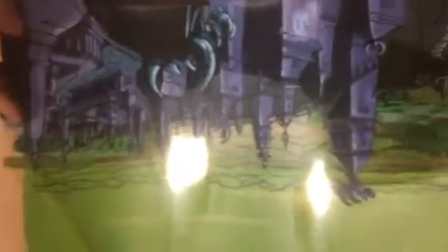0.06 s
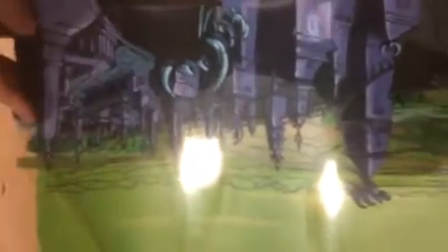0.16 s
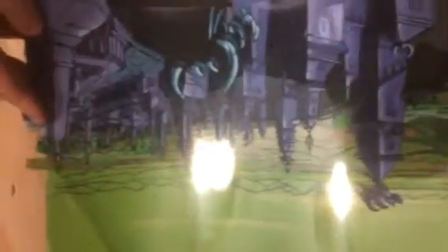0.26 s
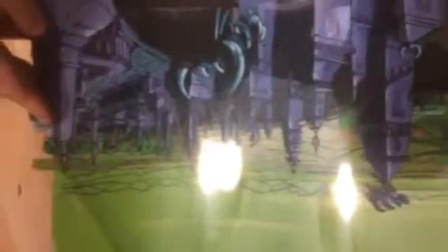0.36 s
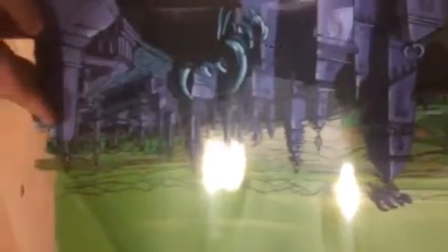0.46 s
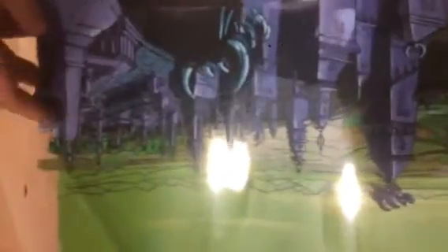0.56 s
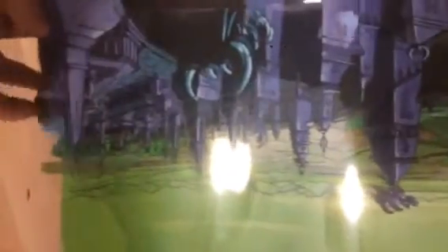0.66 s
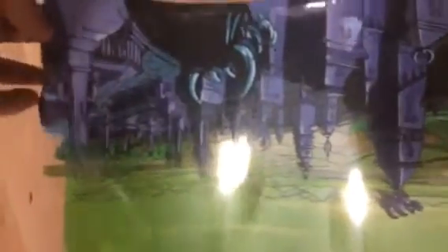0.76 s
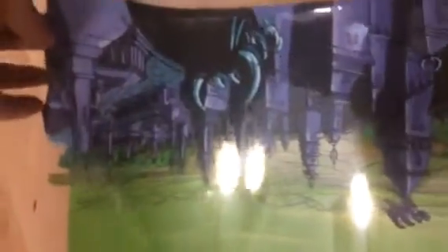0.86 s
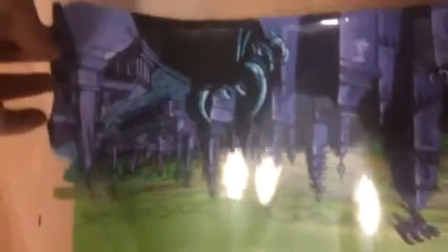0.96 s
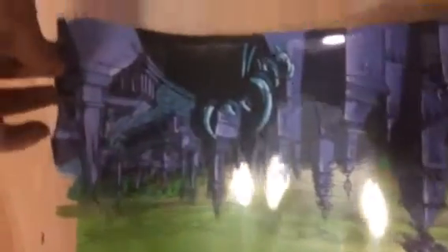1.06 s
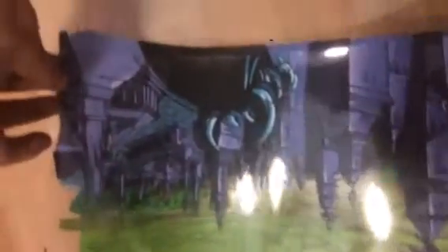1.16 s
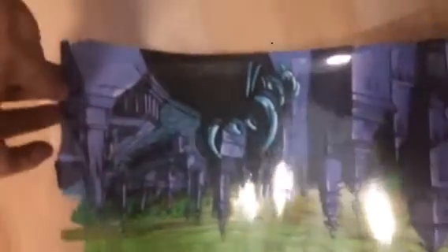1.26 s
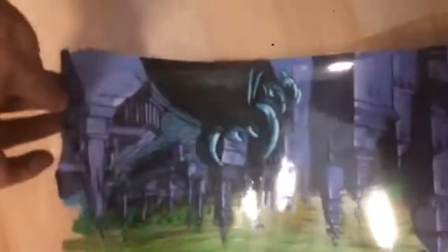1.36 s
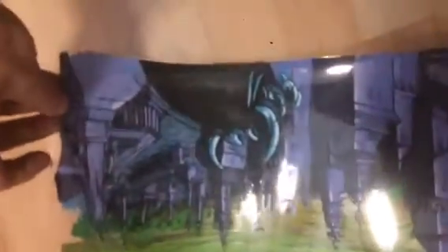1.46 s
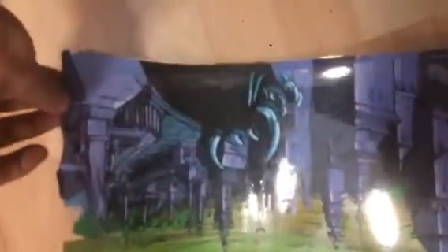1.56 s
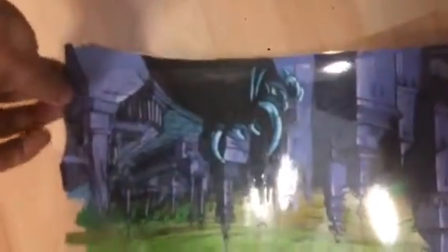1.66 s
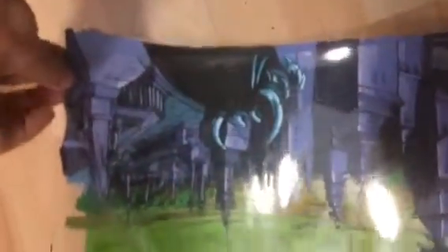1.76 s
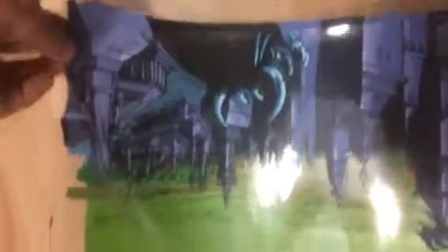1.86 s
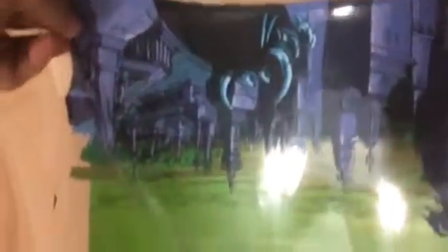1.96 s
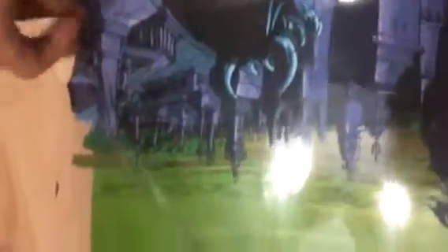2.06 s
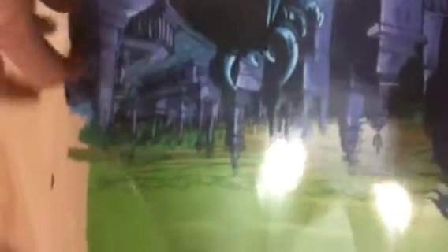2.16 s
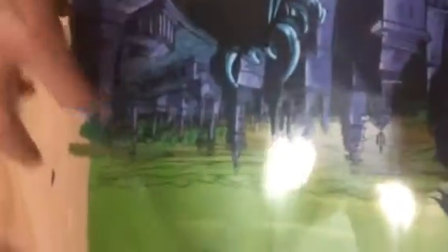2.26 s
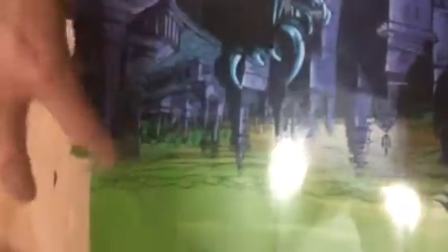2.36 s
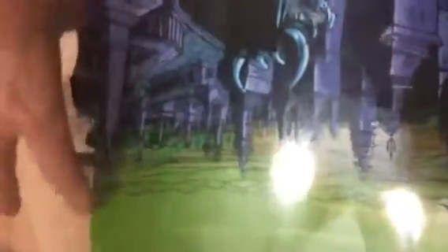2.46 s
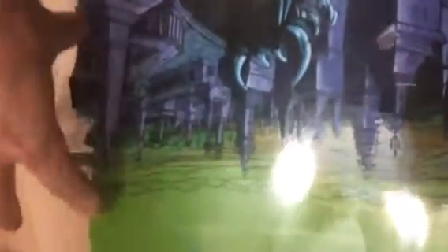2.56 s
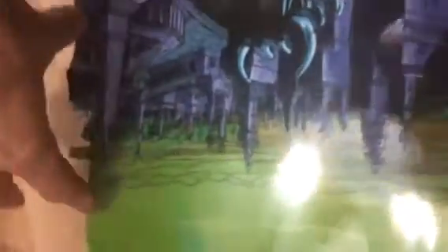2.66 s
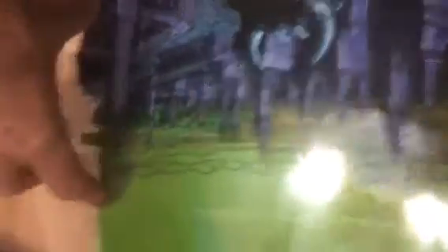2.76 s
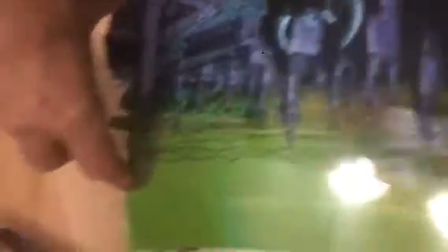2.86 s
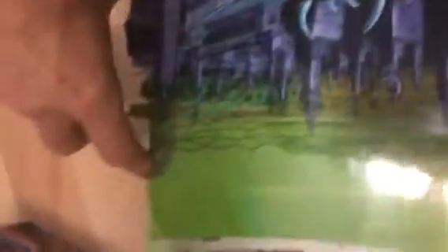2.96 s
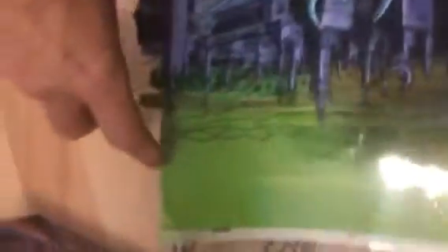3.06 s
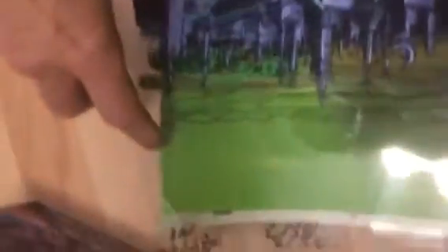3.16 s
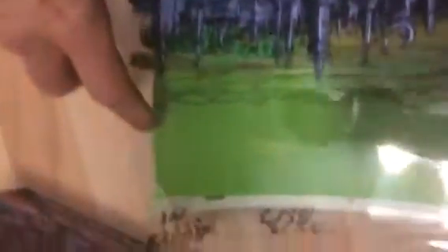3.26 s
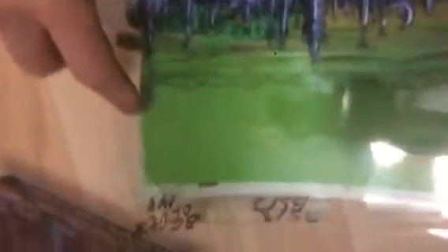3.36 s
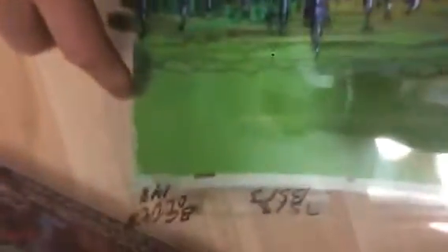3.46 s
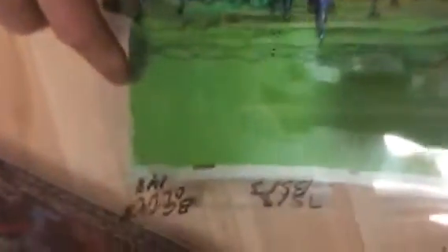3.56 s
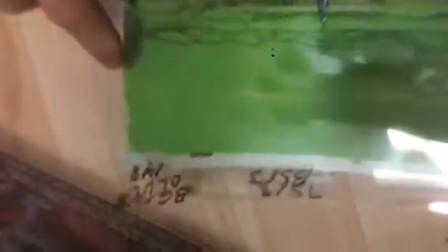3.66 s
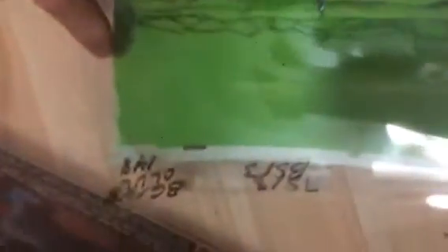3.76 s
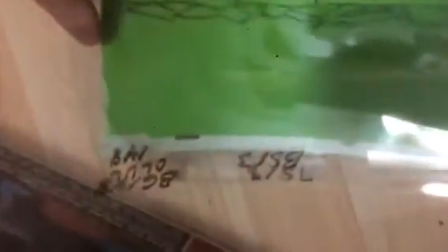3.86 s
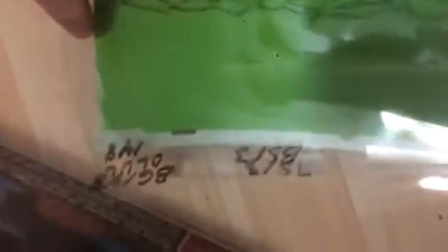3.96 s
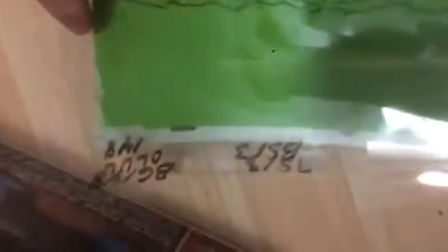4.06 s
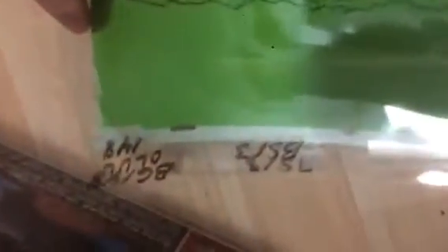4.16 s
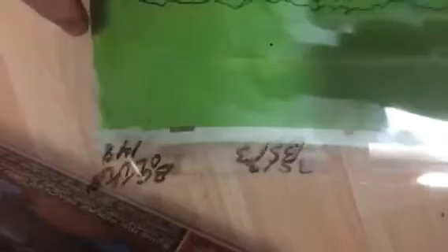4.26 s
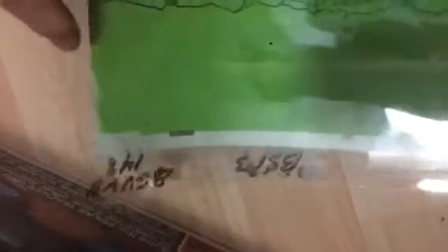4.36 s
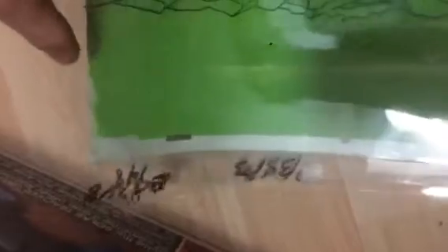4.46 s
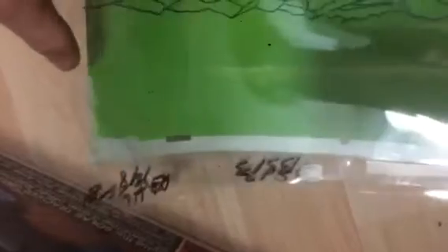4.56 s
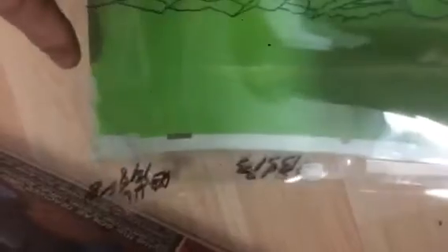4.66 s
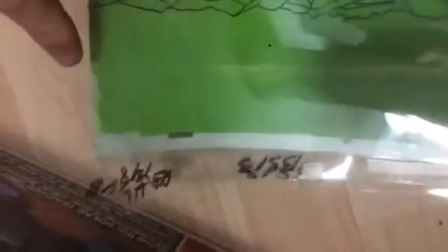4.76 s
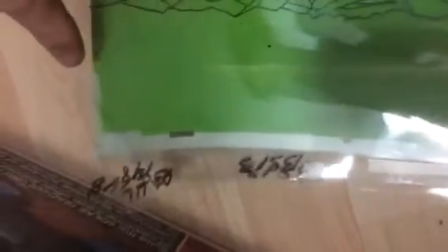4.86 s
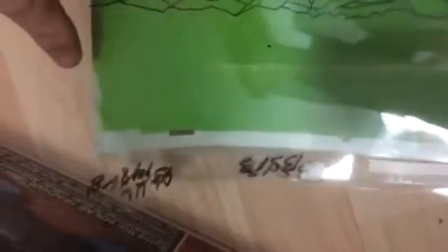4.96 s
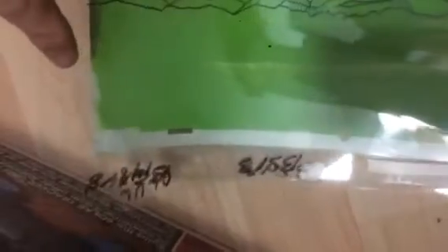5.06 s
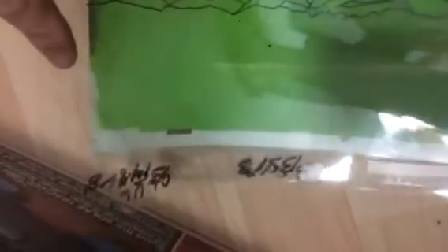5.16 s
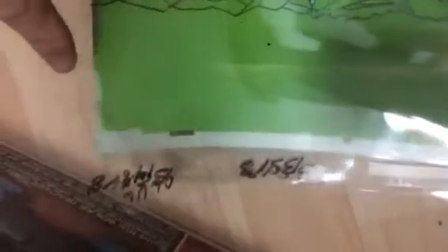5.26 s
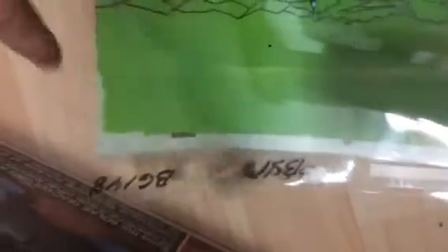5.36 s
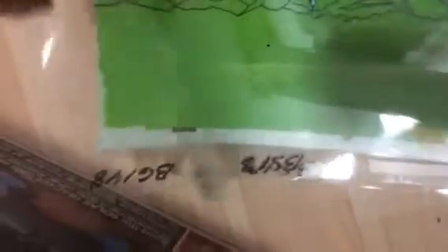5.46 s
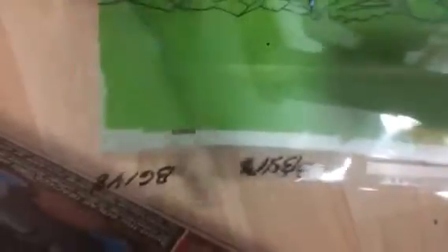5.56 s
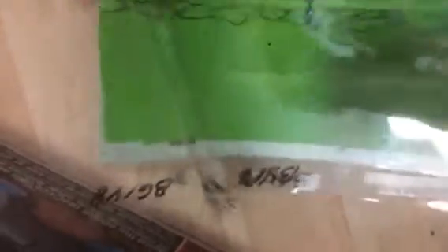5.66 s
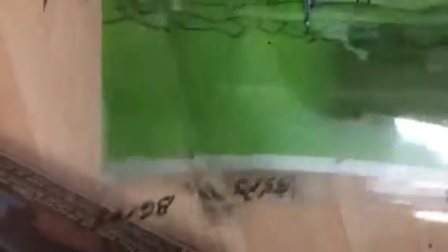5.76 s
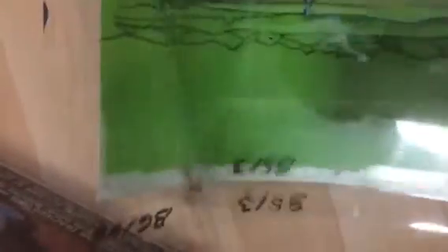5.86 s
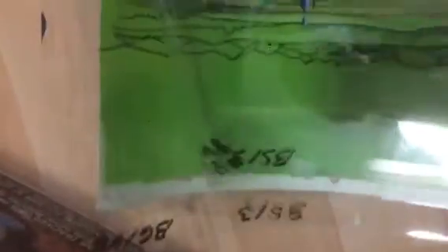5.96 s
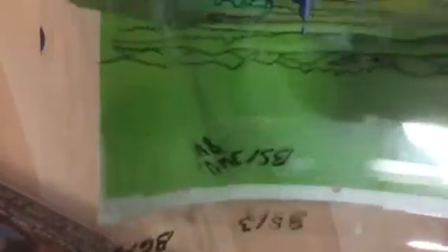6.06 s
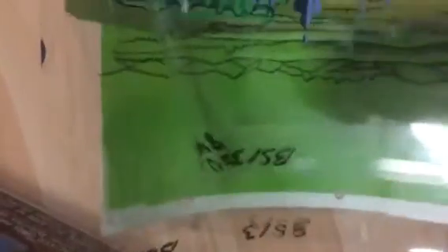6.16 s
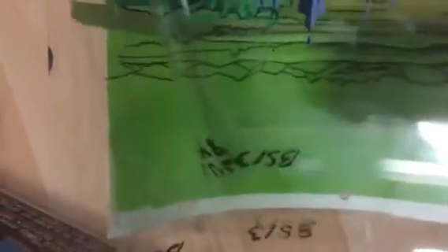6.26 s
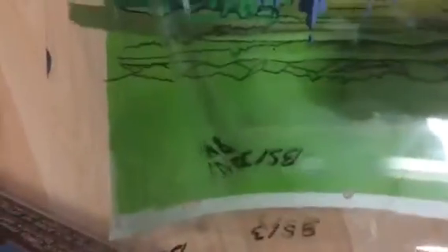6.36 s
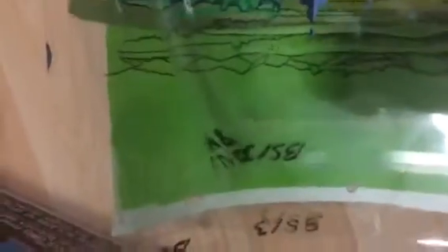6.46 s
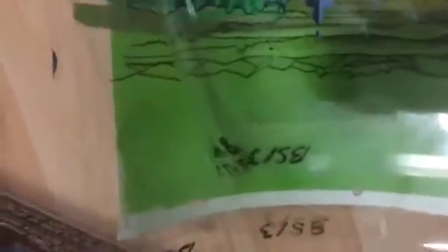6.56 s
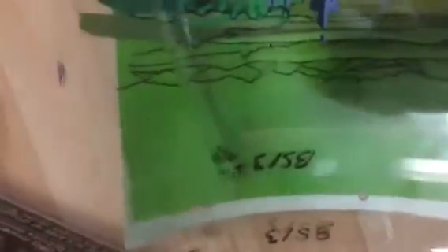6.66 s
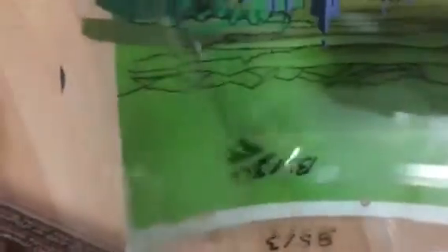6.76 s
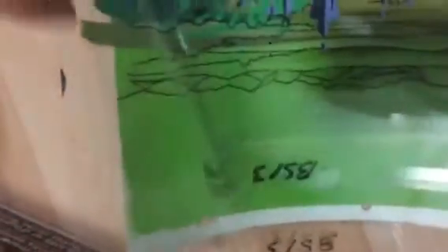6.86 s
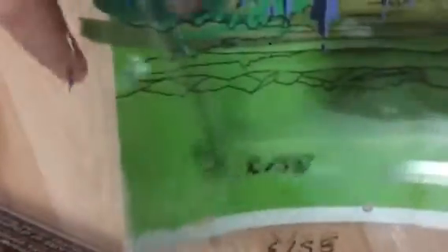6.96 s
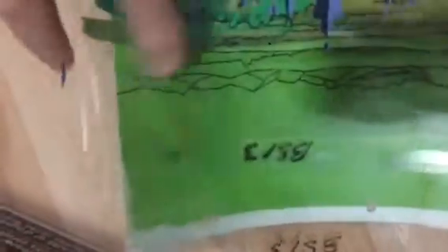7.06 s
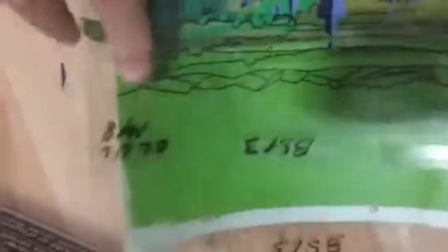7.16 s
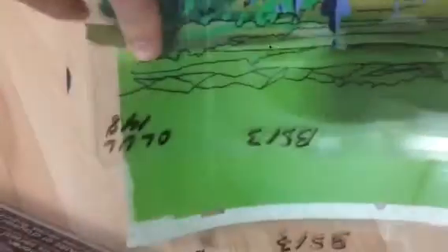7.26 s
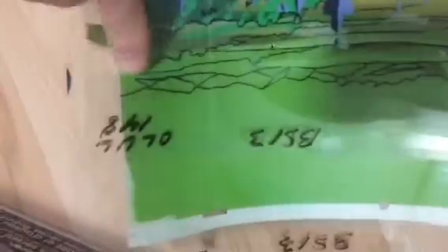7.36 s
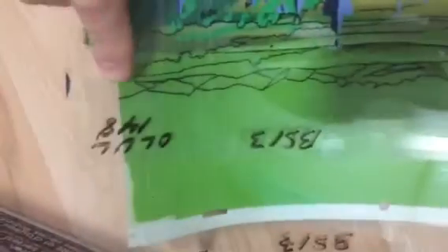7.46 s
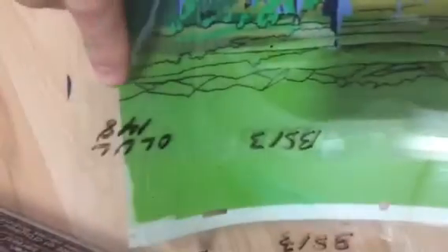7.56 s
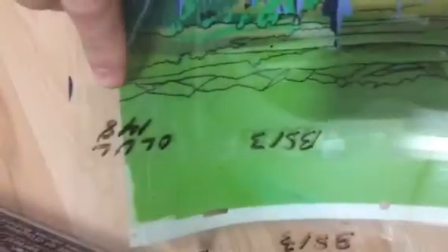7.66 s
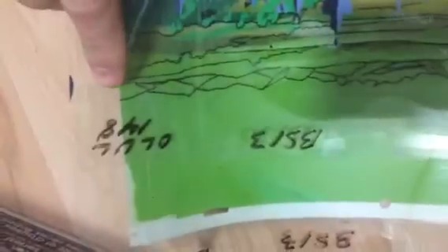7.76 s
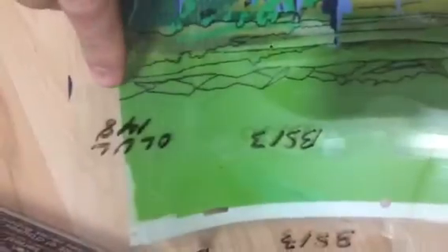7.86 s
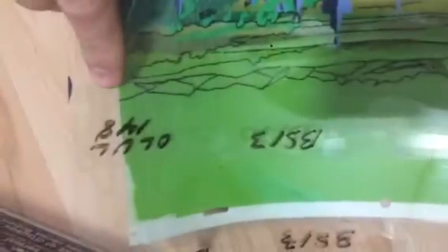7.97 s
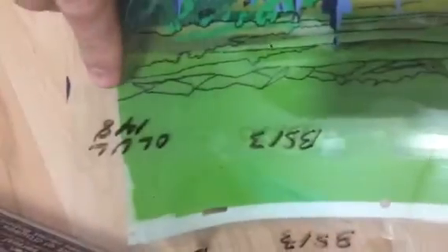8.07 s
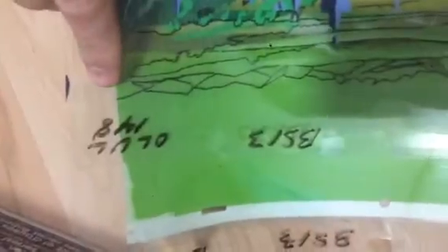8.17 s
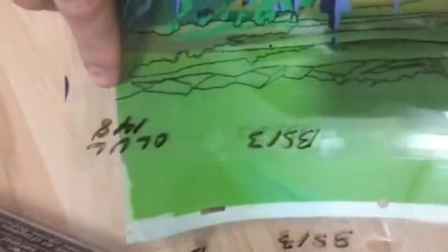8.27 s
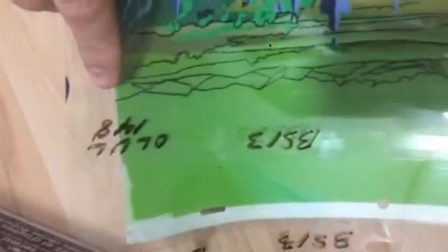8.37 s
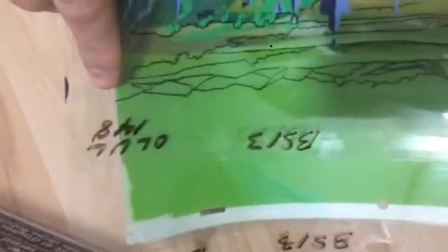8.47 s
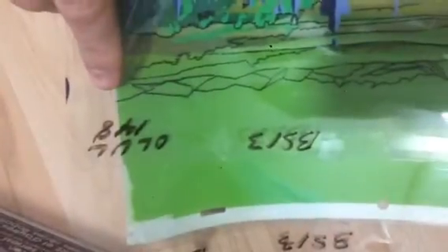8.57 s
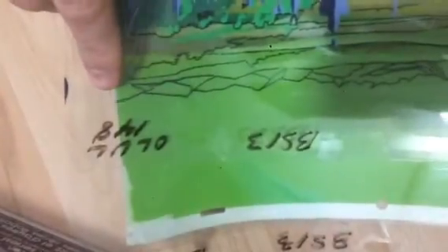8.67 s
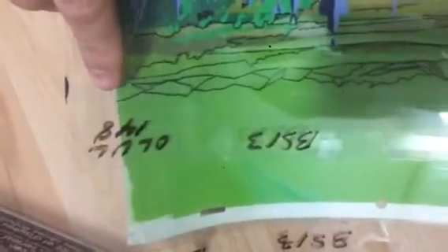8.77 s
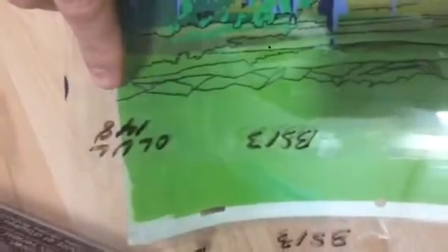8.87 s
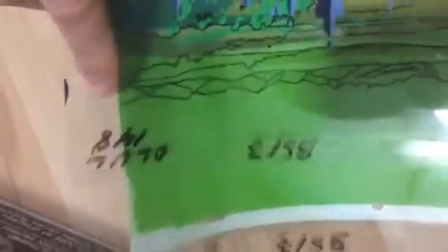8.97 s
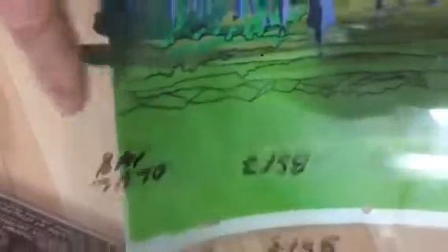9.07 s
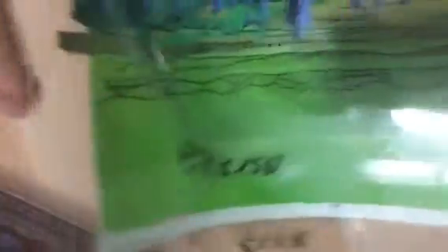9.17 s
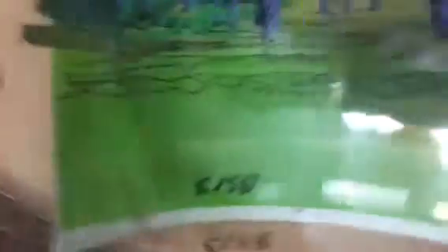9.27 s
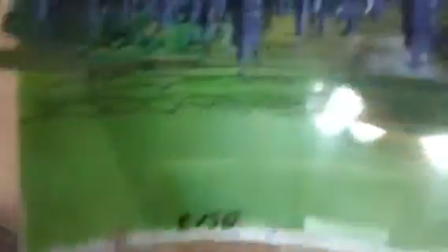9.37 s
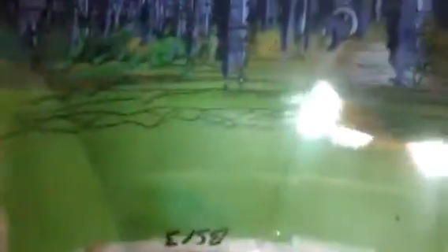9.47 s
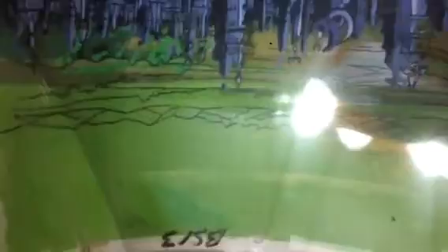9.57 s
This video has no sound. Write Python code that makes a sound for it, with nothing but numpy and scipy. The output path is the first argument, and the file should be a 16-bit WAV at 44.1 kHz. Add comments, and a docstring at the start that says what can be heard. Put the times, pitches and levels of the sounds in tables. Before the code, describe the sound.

Hands shift and lift slick film sheets over a tabletop. Papery hissing strokes come in uneven clusters, with bright clicks, brief gliding edge tones, light low thumps and faint low flutter. The strongest rustles arrive after the middle, then almost nothing, then a rapid crackle and slide at the end. Close microphone, little echo, faint air noise and hum.

```python
"""Clear plastic sheets and paper slide over a wooden table close by: tiny friction slips ring the sheets' modes.
Dragged edges sing in gliding resonances or squeak on one bending note; flicks and buckles are filtered
noise bursts with a crack. Fingers and falling sheets thump softly as damped low swings with a puff of air.
Bending sheets flutter at a low pitch. Behind lie the sparse echoes, air noise and faint hum of a small room."""
import sys
import numpy as np
from scipy import signal
from scipy.fft import rfft, irfft
from scipy.io import wavfile
from scipy.ndimage import uniform_filter1d

SR = 44100
rng = np.random.default_rng(int(sys.argv[2]) if len(sys.argv) > 2 else 0)


def store_wav(level_fs):
    """Save 16-bit WAV to argv[1]."""
    pcm = np.round(np.clip(np.atleast_2d(level_fs), -1, 1) * 32767)
    wavfile.write(sys.argv[1], SR, pcm.T.astype(np.int16))


N = 423360


def gain_of(db):
    """Logarithmic level: converts decibels to an amplitude ratio."""
    return 10 ** (np.asarray(db) / 20)


def evened(x):
    """Normalization: scales a signal to rms 1."""
    return x / np.sqrt(np.mean(x ** 2) + 1e-20)


def read(points, hz):
    """Spectral interpolation: reads a table along a logarithmic frequency axis."""
    f, value = np.transpose(points)
    return np.interp(np.log(hz + 1), np.log(f + 1), value)


def add(mix, s, sound):
    """Superposition: adds a sound to the mix from time s [s]."""
    part = mix[max(round(s * SR), 0):][:len(sound)]
    part += sound[:len(part)]


def band(hz, low_hz, high_hz):
    """Band-pass response: gain with skirts of 12 dB per octave."""
    low_skirt = 1 + (low_hz / (hz + 1)) ** 4
    high_skirt = 1 + (hz / high_hz) ** 4
    return 1 / np.sqrt(low_skirt * high_skirt)


def causal(gain):
    """Minimum phase: the quickest-starting impulse response that has this gain curve."""
    log_gain = np.log(np.maximum(gain, 1e-5))
    circle = np.r_[log_gain, log_gain[-2:0:-1]]
    return np.fft.ifft(np.exp(np.conj(signal.hilbert(circle)))).real


def noise(colour):
    """Spectral shaping: steady noise of rms 1 with the gain curve colour(hz)."""
    spectrum = rfft(rng.standard_normal(N))
    return evened(irfft(spectrum * colour(np.fft.rfftfreq(N, 1 / SR)), N))


def drift(shape, size):
    """Smoothed randomness: a twice-averaged random field of rms 1."""
    field = rng.standard_normal(shape)
    for axis, span in enumerate(size):
        field = uniform_filter1d(uniform_filter1d(field, span, axis), span, axis)
    return evened(field)


def background(air_db=-68, hum_hz=120, hum_db=-75.5):
    """Stationary room noise: coloured air noise and a sinusoidal mains hum, at rms levels."""
    # spectrum of the air: (frequency [Hz], relative level [dB])
    air_colour = [(24, -39.5), (40, -2), (121, -8), (147, -12), (243, -17), (491, -22), (542, -21),
                  (600, -26), (1040, -24.5), (1150, -27), (5310, -36.5), (14100, -36), (16000, -43)]
    air = noise(lambda hz: gain_of(read(air_colour, hz)))
    hum = np.sqrt(2) * np.sin(2 * np.pi * hum_hz * np.arange(N) / SR)
    return gain_of(air_db) * air + gain_of(hum_db) * hum


def wobbling(low_hz=62, high_hz=90, lumpy_db=2):
    """Low-frequency radiation: bending sheets fan the air, as narrow-band noise in uneven lumps."""
    # flutter of the sheets: (time [s], level before the lumps [dB])
    wobble = [(0, -88), (.5, -67), (1.2, -76.5), (1.8, -69.5), (3.2, -79), (4.8, -69), (6.8, -65), (8, -65),
              (8.4, -74.5), (9.6, -67.5)]
    level_db = np.interp(np.arange(N) / SR, *np.transpose(wobble))
    level_db = level_db + lumpy_db * drift(N, size=[4000])
    return noise(lambda hz: band(hz, low_hz, high_hz) ** 2) * gain_of(level_db)


def room(x, first_s=0.002):
    """Reverberation: sparse reflections whose frequency bands decay at different rates."""
    # decay of the room: (frequency [Hz], time to fall 60 dB [s])
    reverberation = [(200, 0.11), (1500, 0.34), (5000, 0.1), (14000, 0.32)]
    count = SR // 2
    present = rng.random(count) < 3000 / SR  # 3000 reflections per second
    taps = rng.choice([-1., 1.], count) * present * (np.arange(count) > first_s * SR)
    hz, t, z = signal.stft(taps, SR, nperseg=256)
    decay_db = -60 * t / read(reverberation, hz)[:, None]
    tail = signal.istft(z * gain_of(decay_db), SR, nperseg=256)[1]
    return signal.fftconvolve(x, tail / np.linalg.norm(tail))[:N]


def thumping(puff_db=-9, puff_reach=2.8):
    """Damped oscillation: each soft blow is a few low swings and a noisy puff of squeezed-out air."""
    # blows of fingers and sheets on the table:
    # (time [s], swing level before its envelope [dB], pitch [Hz], decay [s])
    thumps = [(0.082, -50, 203, 0.0071), (0.108, -43.5, 200, 0.0051), (0.782, -39, 150, 0.0055),
              (1.609, -47.5, 232, 0.0063), (2.203, -33, 241, 0.005), (2.206, -29, 623, 0.0036),
              (2.251, -43.5, 196, 0.0053), (3.576, -31.5, 1190, 0.003), (3.872, -43.5, 183, 0.0034),
              (5.452, -35.5, 126, 0.0063), (5.512, -44, 149, 0.0073), (5.548, -46, 150, 0.01),
              (5.9675, -25.5, 725, 0.0045), (6.788, -42, 72.5, 0.024), (6.995, -28, 136, 0.0025),
              (7.068, -44, 252, 0.0034), (7.184, -32, 86, 0.0089), (7.19, -39, 476, 0.0038),
              (9.237, -49, 322, 0.013), (9.373, -46, 115, 0.0099)]
    out, t = np.zeros(N), np.arange(SR // 5) / SR
    for s, db, hz, decay in thumps:
        puff_band = signal.butter(2, [hz / 2, hz * puff_reach], "band", fs=SR, output="sos")
        puff = evened(signal.sosfilt(puff_band, rng.standard_normal(len(t))))
        swing = np.sin(2 * np.pi * hz * t) + gain_of(puff_db) * puff
        envelope = np.exp(-t / decay) * (1 - np.exp(-t / 0.0015))  # onset softened over 1.5 ms
        add(out, s, gain_of(db) * swing * envelope)
    return out


def snapping(level_db=-3.0, sudden_s=0.00023, ring_db=-25, ring_s=0.026, crack=1.0,
             focus_db=7, focus_octaves=0.52):
    """Sudden release: an edge scrapes harder, lets go with a crack, and the sheet rings briefly."""
    # flicks, buckles and taps of a sheet:
    # (time [s], relative level [dB], centre [Hz], breadth [octaves], build-up [s], decay [s])
    snaps = [(0.084, -14, 490, 1.1, 0.003, 0.0018), (0.112, -14, 900, 0.9, 0.00022, 0.0018),
             (0.208, -14, 1440, 1.7, 0.0015, 0.004), (0.721, -5, 2450, 0.96, 0.001, 0.0049),
             (0.77, 13.5, 3420, 1.16, 0.0069, 0.0024), (0.773, 18.5, 2180, 0.2, 0.0015, 0.0014),
             (0.7804, 19.5, 2000, 0.1, 0.00072, 0.00083), (1.608, -10, 1400, 6.6, 0.0019, 0.0042),
             (2.2038, 8, 2210, 4.1, 0.00023, 0.0021), (2.2067, 21.5, 2840, 0.48, 0.00071, 0.0012),
             (2.253, 11, 3300, 2.7, 0.0038, 0.0015), (2.258, 3, 2660, 4, 0.002, 0.0068),
             (2.398, -1.5, 3080, 2.2, 0.0022, 0.048), (2.495, 5.5, 3300, 0.71, 0.0019, 0.017),
             (2.801, -19, 2020, 4.4, 0.00018, .0036), (3.5652, -11, 3200, 4, 0.00018, 0.0018),
             (3.575, 1, 2470, 1.94, 0.00038, 0.00078), (5.133, -8.5, 2380, 1.4, 0.0003, 0.0011),
             (5.426, 21.5, 3660, 0.067, 0.002, 0.0037), (5.4295, 20.5, 3900, 0.08, 0.00032, 0.0013),
             (5.431, 8.5, 1505, 0.4, 0.0014, 0.0015), (5.448, 4, 1034, 1.6, 0.0033, 0.003),
             (5.818, -0.5, 3070, 1.8, 0.00068, 0.0031), (5.9668, 6.5, 3840, 4.2, 0.000028, .0004),
             (5.969, 3, 2280, 3.8, 0.00031, 0.008), (6.7809, 4.5, 3000, 0.64, 0.0013, 0.00068),
             (6.791, -8, 2810, 3.9, 0.0059, .0013), (6.998, 8.5, 2000, 2.16, 0.0023, 0.0026),
             (7.041, 5, 2680, .1, 0.00098, .0018), (7.07, 1.5, 1410, 0.91, 0.00036, 0.0023),
             (7.173, -5.5, 3650, 2.3, 0.00018, 0.00066), (7.1865, 3, 3200, 5.2, 0.00067, 0.00057),
             (7.1871, 12.5, 11200, 0.32, 0.001, 0.0007), (7.202, -8, 9100, 1.4, 0.0002, 0.0008),
             (7.192, -0.5, 1430, 2.6, 0.00051, 0.0048), (7.979, -23.5, 2580, 3.9, 0.000089, 0.0027),
             (8.681, -6.5, 845, .1, 0.00013, 0.00089), (8.697, -6.5, 1165, .1, .0003, 0.0036),
             (8.992, -9, 2850, 2.6, 0.00054, 0.00031), (9.081, 0, 1820, 3.8, 0.0014, 0.00098),
             (9.105, -1, 2480, 4.4, 0.0044, 0.0039), (9.118, 16, 4470, 0.75, 0.00016, 0.00038),
             (9.132, 2, 3430, 3.2, .0023, 0.0064), (9.14, 15, 4400, 0.55, 0.00031, 0.00037),
             (9.143, 11, 4400, 0.3, 0.00074, 0.0015), (9.1468, 15.5, 2930, 2, 0.0004, 0.0014),
             (9.1514, 8.5, 3300, 2.9, 0.0004, 0.0017), (9.1565, 8, 4300, 1.4, 0.00042, 0.0013),
             (9.163, 15, 4200, 0.6, 0.00047, 0.00038), (9.1644, 8, 2840, 3.9, 0.0005, 0.0039),
             (9.2095, 18, 2400, 2, 0.00051, 0.00092), (9.2336, 26, 1630, 0.66, 0.00066, 0.00097)]
    # spectrum of a snap: (frequency [Hz], relative level [dB])
    snap_colour = [(300, -1), (600, 0.5), (1000, -6.5), (1500, -5.5), (2000, -5.5), (2700, -9), (4500, -6),
                   (6500, -5.5), (8500, -12), (12000, -12.5), (15500, -20)]
    taps = 2048
    out, hz = np.zeros(N), np.fft.rfftfreq(taps, 1 / SR)
    t = np.arange(-taps // 2, SR // 10) / SR  # the release is at t = 0
    for s, db, centre_hz, octaves, rise, decay in snaps:
        reach = 2 ** (octaves / 2)
        off_centre = 1 - np.exp(-(np.log2((hz + 1) / centre_hz) / focus_octaves) ** 2)
        # a narrow snap is a buckle ringing one patch of sheet
        focus = focus_db * np.exp(-octaves) * (.5 - off_centre)
        colour = gain_of(read(snap_colour, hz) + focus)
        ring = causal(colour * band(hz, centre_hz / reach, centre_hz * reach))
        swell = np.exp(-abs(t) / np.where(t < 0, rise, decay))
        swell += (t >= 0) * gain_of(ring_db) * np.exp(-abs(t) / ring_s)
        burst = swell * rng.standard_normal(len(t))
        burst /= np.linalg.norm(burst)
        burst[taps // 2] += crack * np.exp(-rise / sudden_s)  # a quicker build-up gives a stronger crack
        snap = signal.fftconvolve(burst, ring)
        snap *= np.linalg.norm(ring) / np.linalg.norm(snap)
        add(out, s + t[0], snap * gain_of(db + level_db))
    return out


def friction(slips_per_s=2500, slip_spread_db=4.5, slip_share=0.12, judder_db=1.5):
    """Dry friction: tiny slips of uneven size over a smooth hiss; the contact grips and lets go."""
    sizes = gain_of(slip_spread_db * np.minimum(rng.exponential(1, N), 5))
    slips = evened(sizes * rng.choice([-1, 1], N) * (rng.random(N) < slips_per_s / SR))
    hiss = rng.standard_normal(N)
    drive = np.sqrt(slip_share) * slips + np.sqrt(1 - slip_share) * hiss  # shares of power
    return evened(drive * gain_of(judder_db * drift(N, size=[220])))


def resonate(x, hz, width):
    """Time-varying resonance: heterodynes along the curve hz and low-passes to the width [Hz]."""
    turn = np.exp(2j * np.pi * np.cumsum(hz) / SR)
    r = np.exp(-np.pi * width / SR)
    return 2 * (turn * signal.lfilter([1 - r], [1, -r], x / turn)).real


def scraping(fade=0.46):
    """Driven resonance: friction excites an edge, gliding in pitch as its free span changes length."""
    # edges singing in the free span of the sheet: (start [s], end [s], level before fading [dB],
    # first pitch [Hz], last pitch [Hz], width of each of two resonances in series [Hz])
    scrapes = [(0.083, 0.198, -64, 1460, 1360, 260), (0.107, 0.23, -69, 990, 890, 400),
               (0.754, 0.773, -39.5, 2010, 1950, 400), (2.235, 2.271, -38, 1970, 1890, 500),
               (2.384, 2.427, -51.5, 1820, 1890, 697), (2.827, 2.911, -54.5, 3000, 2900, 1100),
               (3.084, 3.36, -62.5, 1910, 2020, 550), (3.2, 3.345, -67.5, 1250, 1170, 450),
               (3.574, 3.665, -64.5, 2000, 1980, 600), (4.271, 4.316, -48, 2000, 2060, 300),
               (4.314, 4.44, -55.5, 2080, 1710, 380), (4.394, 4.602, -52, 2160, 1950, 520),
               (4.486, 4.627, -66, 3000, 2750, 1100), (4.422, 4.502, -55, 3540, 3400, 1200),
               (5.378, 5.451, -42, 3350, 4060, 1950), (5.585, 5.62, -49, 8700, 8100, 1400),
               (5.695, 5.76, -57.5, 3030, 2850, 1300), (7.23, 7.373, -52, 2120, 1930, 710),
               (8.281, 8.659, -79, 1486, 1580, 600), (8.675, 8.786, -64.5, 1230, 1440, 1070),
               (9.224, 9.265, -39, 1310, 710, 810), (9.312, 9.387, -45.5, 3100, 3500, 900)]
    out, drive = np.zeros(N), friction()
    for start, end, db, first_hz, last_hz, width in scrapes:
        slips = drive[round(start * SR):round(max(end, start + .01) * SR)]
        hz = np.linspace(first_hz, last_hz, len(slips))
        song = resonate(resonate(slips, hz, width), hz, width)
        add(out, start, gain_of(db) * evened(song) * signal.windows.tukey(len(slips), fade))
    return out


def squeaking(waver=0.013, flutter_db=2.5, fade=0.47):
    """Stick-slip locking: one thin note bends with the sheet and wavers in pitch and level."""
    # squeaks of a catching edge: (start [s], end [s], level before fading [dB],
    # first pitch [Hz], middle pitch [Hz], last pitch [Hz]), pitches before the waver
    squeaks = [(0.002, 0.052, -75, 4720, 4900, 4900), (3.085, 3.195, -69.5, 1250, 1130, 1030),
               (3.195, 3.26, -65, 1140, 1102, 900), (3.25, 3.335, -71, 900, 1030, 960),
               (9.3, 9.35, -48.5, 5050, 5250, 5270), (9.33, 9.375, -50, 2180, 1915, 1750),
               (9.34, 9.398, -45, 2930, 2960, 3060), (9.363, 9.391, -47.5, 3840, 4000, 3960)]
    out = np.zeros(N)
    pitch = np.exp(waver * drift(N, size=[160]))
    grip = gain_of(flutter_db * drift(N, size=[300]))
    for start, end, db, *bend_hz in squeaks:
        span = np.arange(max(round(start * SR), 0), round(max(end, start + .01) * SR))
        bend = np.polyfit([0, .5, 1], bend_hz, 2)  # parabola through the three pitches
        hz = np.polyval(bend, np.linspace(0, 1, len(span))) * pitch[span]
        note = evened(np.sin(2 * np.pi * np.cumsum(hz) / SR) * grip[span])
        add(out, start, gain_of(db) * note * signal.windows.tukey(len(span), fade))
    return out


def crinkle(creases_per_s=70, crease_db=-11, spread_db=4):
    """Random impulses: small creases pop as the sheet flexes."""
    sizes = gain_of(spread_db * np.minimum(rng.exponential(1, N), 2))
    return gain_of(crease_db) * evened(sizes * (rng.random(N) < creases_per_s / SR))


def pushes(gather_power=0.5, fade_db=-17.5, fade_bend=1.125, stop_s=0.014):
    """Power summation: overlapping pushes add their powers, and the strongest dominates the colour."""
    # pushes of sheet over sheet: (start [s], speeding up [s], slowing down [s], relative level [dB],
    # treble slope [dB per octave], body from pressing on the table [dB])
    strokes = [(0, 0.18, 0.48, -60, -2, 14.5), (.25, 0.25, 0.43, -63.5, -5.5, 2),
               (0.644, 0.041, 0.088, -46.5, -3.5, -2), (.725, 0.064, 0.068, -36, -7.5, -6),
               (.81, 0.037, 0.11, -47.5, -0.5, 4), (0.899, 0.06, 0.057, -48.5, -3.5, 3),
               (.98, 0.086, 0.39, -62, 0, 8), (1.39, 0.052, 0.15, -52.5, -3, 1.5),
               (1.565, 0.043, 0.075, -49.5, -3.5, 8), (1.56, 0.6, .45, -60.5, -3.5, 13),
               (2.199, .02, 0.054, -30, -4.5, -4), (2.24, 0.051, 0.1, -44, 0.5, -2),
               (2.384, 0.041, 0.18, -47, 2, -9), (2.485, 0.024, 0.093, -40, -0.5, 4.5),
               (2.58, 0.058, 0.07, -45, 1, 0.5), (2.69, 0.042, 0.036, -53, 0.5, 3),
               (2.76, 0.054, 0.052, -55, 1, 3), (2.82, 0.053, 0.052, -43.5, -3, 3),
               (2.999, 0.046, 0.42, -53.5, -2.5, 4.5), (3.171, .15, 0.035, -61.5, -3, 18),
               (3.565, 0.039, 0.086, -53.5, -5.5, 8), (4.27, 0.018, 0.15, -44.5, -4.5, 3),
               (4.366, 0.095, 0.13, -37, -6, -2.5), (4.53, 0.069, 0.065, -50.5, -3.5, -1),
               (4.629, 0.062, 0.04, -51, -2.5, 0.5), (4.78, 0.042, 0.1, -58, -1.5, -4),
               (4.989, 0.13, 0.11, -46.5, -4.5, -3), (5.28, 0.044, 0.072, -56, -5.5, -22),
               (5.34, 0.088, 0.11, -40.5, -7, -17), (5.43, 0.028, 0.36, -46, 0.5, 7.5),
               (5.56, 0.044, 0.047, -42, 3, 1), (5.67, 0.098, 0.2, -49, 0.5, 0),
               (5.799, 0.028, 0.15, -38.5, -1.5, 3), (5.851, 0.081, 0.13, -29, 1, -18),
               (6.015, .02, 0.019, -40.5, 5, -25), (6.02, 0.044, 0.22, -50.5, 3, -13),
               (6.1, 0.13, 0.12, -47, 0.5, -6.5), (6.644, 0.16, 0.053, -44, -1, 2),
               (6.83, 0.042, 0.2, -50, -2.5, 3), (6.993, 0.024, 0.081, -26.5, -3.5, -10),
               (7.04, 0.076, 0.24, -35.5, -5, -9), (7.17, 0.02, 0.045, -31.5, -6.5, -12),
               (7.24, 0.046, 0.092, -33, -6, -6), (7.37, .12, 0.12, -50.5, 0.5, 1.5),
               (7.57, 0.068, 0.23, -55.5, -4.5, 5), (7.829, .03, 0.038, -60.5, -6, 1),
               (8.24, 0.27, .26, -73, -6, 20), (8.68, 0.045, 0.26, -57, -2.5, 9.5),
               (8.84, 0.21, .04, -61.5, -3, 15.5), (8.99, 0.037, 0.21, -45, -3.5, 5.5),
               (9.045, 0.043, 0.63, -33, -4, 1), (9.23, 0.12, 0.16, -32, -3, -20),
               (9.409, 0.048, 0.055, -37, 2, -31.5), (9.5, 0.069, 0.14, -47.5, 0.5, -5)]
    # sheets resting under the hand barely rub:
    # (relative level [dB], treble slope [dB per octave], body [dB])
    rest_db, rest_slope, rest_body = (-75, 1, 8.4)
    power = np.full(N, gain_of(rest_db) ** 2)
    slopes, bodies = power * rest_slope, power * rest_body
    for start, rise, fall, db, slope, body_db in strokes:
        t = np.arange(0, rise + fall, 1 / SR)
        gather = np.sin(np.pi / 2 * np.minimum(t / rise, 1)) ** (2 * gather_power)
        fade = gain_of(fade_db * (np.maximum(t - rise, 0) / fall) ** fade_bend)
        stop = np.minimum((rise + fall - t) / stop_s, 1)
        push = (gain_of(db) * gather * fade) ** 2 * stop
        add(power, start, push)
        add(slopes, start, push * slope)
        add(bodies, start, push * body_db)
    return np.arange(N) / SR, 10 * np.log10(power), slopes / power, bodies / power


def bowing(t, hz, start_s=2.3, end_s=2.93, dip_db=-1.5):
    """Modal emphasis: while the hand holds the sheet bowed, its rubbing rings at fixed pitches."""
    # modes of the bowed sheet: (frequency [Hz], width [Hz], boost above the dip [dB])
    bowed_modes = [(1010, 220, 5), (2140, 220, 7), (3520, 230, 7), (4010, 330, 8), (6300, 500, 6)]
    peaks = sum(db * np.exp(-((hz - centre) / width) ** 2) for centre, width, db in bowed_modes)
    return (dip_db + peaks) * ((t > start_s) & (t < end_s))


def sliding(ripple_db=2.5, level_db=-2.0, low_hz=190, bounce=0.45, bounce_s=.0016, bounce_sway=.14):
    """Modes and comb interference: friction rings shifting modes; the table bounce adds gliding streaks."""
    # spectrum of the rubbing: (frequency [Hz], relative level [dB])
    rub_colour = [(300.0, -7.5), (600.0, -8.5), (1000.0, -3.5), (1500.0, -3.5), (2000.0, -1.5),
                  (2700.0, -2.5), (4500.0, -5), (6500.0, -6.5), (8500.0, -9), (12000.0, -12),
                  (15500.0, -19)]
    hz, t, z = signal.stft(friction() + crinkle(), SR, nperseg=512, noverlap=384)
    s, rub_db, slope, body_db = pushes()
    f = np.maximum(hz, 1)[:, None]
    treble = np.interp(t, s, slope) * np.maximum(np.log2(f / 3000), 0)  # tilts above 3 kHz
    body = np.interp(t, s, body_db) * np.clip(np.log2(2500 / f) / 2, 0, 1)  # grows below 2.5 kHz
    modes = ripple_db * drift(z.shape, size=[3, 22])
    colour_db = read(rub_colour, f) + treble + body + modes + bowing(t, f)
    z = z * gain_of(colour_db) * band(f, low_hz, SR)
    # the gap under the sheet opens and closes
    delay = bounce_s * np.exp(bounce_sway * drift(len(t), size=[50]))
    z = z * (1 + bounce * np.exp(-2j * np.pi * f * delay))
    rub = signal.istft(z, SR, nperseg=512, noverlap=384)[1][:N]
    return rub * gain_of(level_db + rub_db)


def scene(snap_room_db=-16, rub_room_db=-17):
    """Direct and reverberant sound: handling close by with a little room; both channels alike."""
    blows = snapping() + thumping()
    rub = sliding() + scraping() + squeaking()
    echo = room(gain_of(snap_room_db) * blows + gain_of(rub_room_db) * rub)
    mono = blows + rub + echo + wobbling() + background()
    return np.array([mono, mono])


def record(dry, low_cut_hz=24, edge_hz=16000):
    """Band limiting: the microphone's low cut, then the recorder's linear-phase treble limit."""
    low_cut = signal.butter(2, low_cut_hz, "high", fs=SR, output="sos")
    thinned = signal.sosfilt(low_cut, dry)
    treble_limit = signal.firwin(511, edge_hz, window=("kaiser", 9), fs=SR)
    return signal.oaconvolve(thinned, treble_limit[None], "same")


dry = scene()
out = record(dry)
store_wav(out)
```